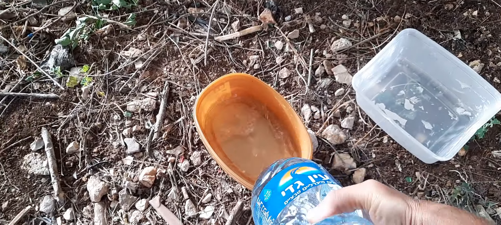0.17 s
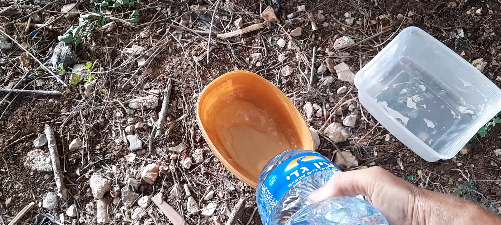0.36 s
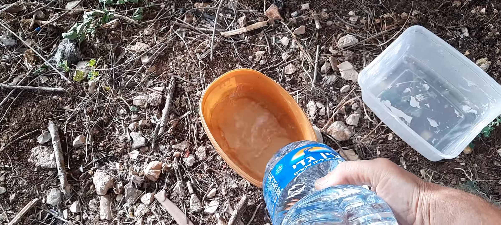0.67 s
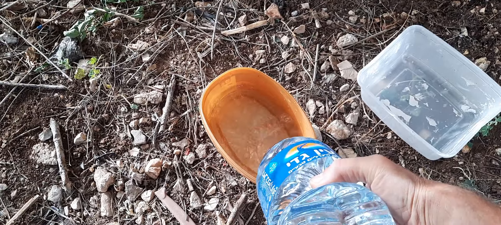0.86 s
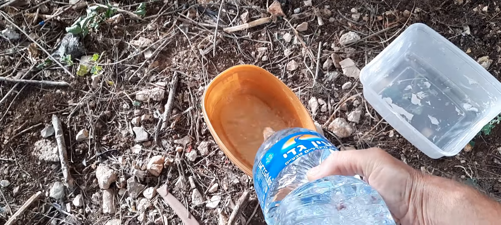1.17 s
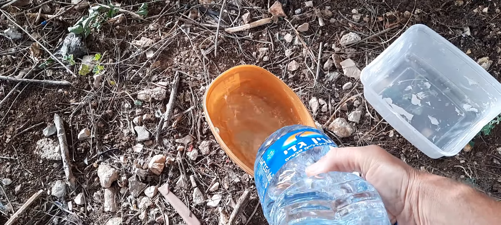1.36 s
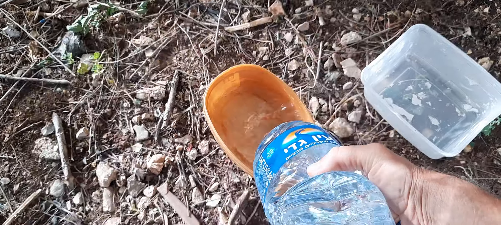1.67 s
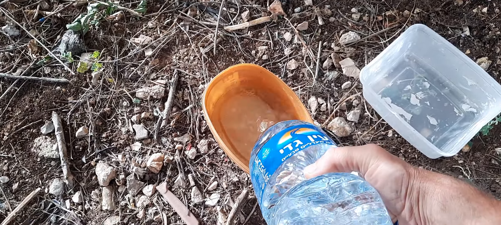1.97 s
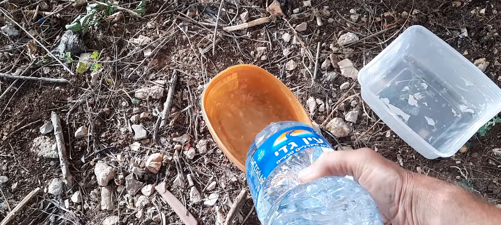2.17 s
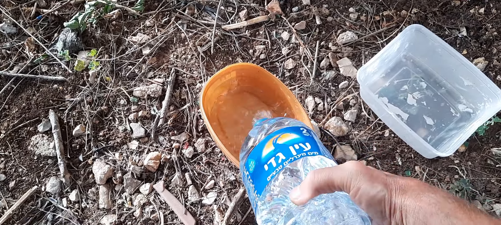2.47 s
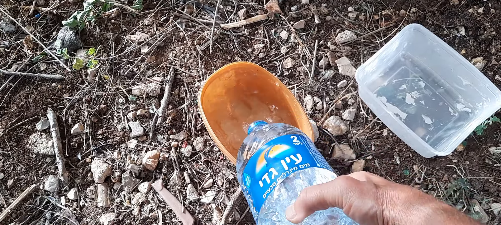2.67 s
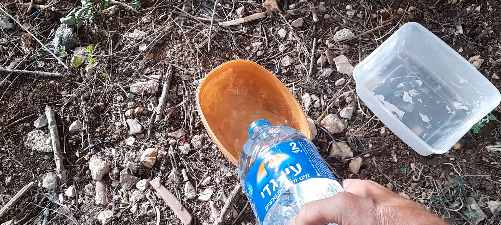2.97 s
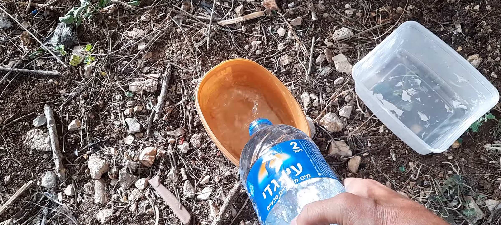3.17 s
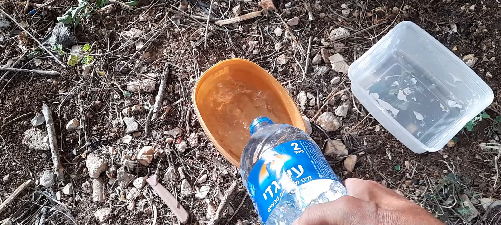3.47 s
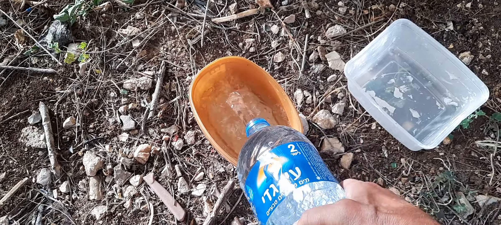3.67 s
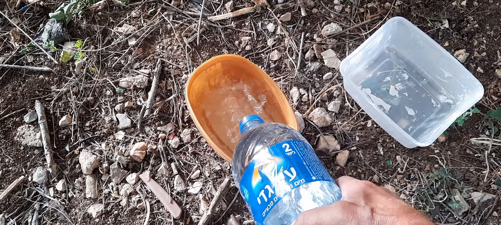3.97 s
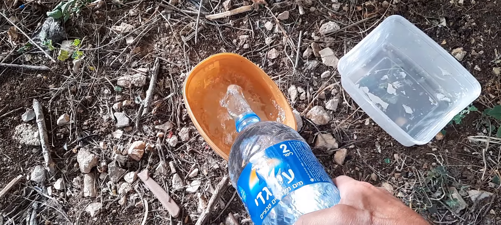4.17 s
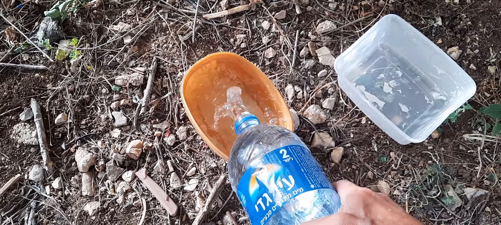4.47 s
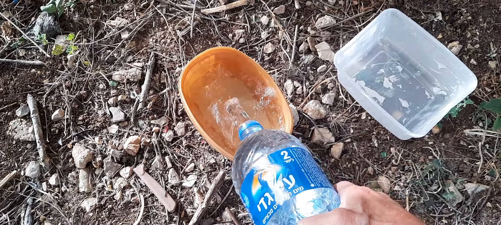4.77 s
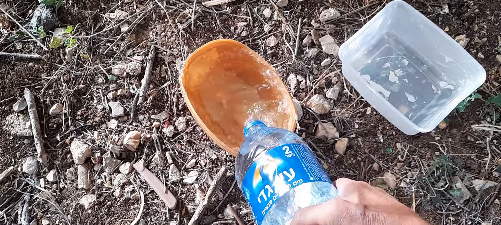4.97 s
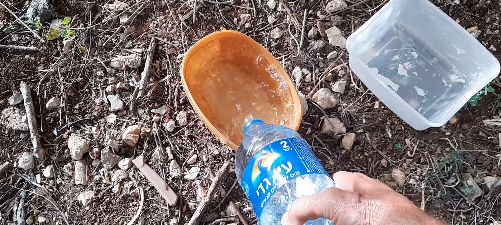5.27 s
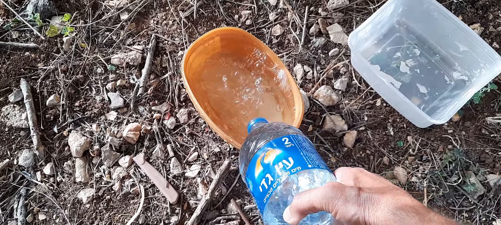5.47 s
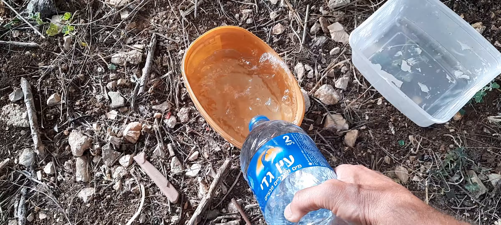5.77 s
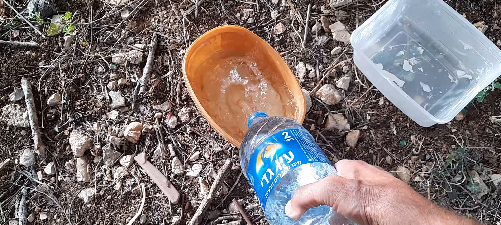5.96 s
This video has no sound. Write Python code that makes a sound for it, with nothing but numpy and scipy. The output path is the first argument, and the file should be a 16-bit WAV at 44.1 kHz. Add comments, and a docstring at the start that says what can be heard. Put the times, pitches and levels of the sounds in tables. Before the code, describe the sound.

Water glugs from a thin plastic bottle into a plastic bowl outdoors, with wall pops, splashing, a faint bird whistle and distant hoot.

```python
"""Air gulps through the neck of a hand-held plastic bottle as water glugs into a plastic bowl.
Gulps are decaying bubble tones that ring damped bottle modes; the wall's snaps are noise bursts through resonances.
Stream and bowl are patchy coloured noise under swarms of bubble sines that climb in pitch.
Behind them a bird whistles and an animal hoots, as gliding tones, over a far hush,
low breeze noise on the microphone ports and soft low bumps."""
import sys
import numpy as np
from scipy import signal
from scipy.fft import rfft, irfft, next_fast_len
from scipy.io import wavfile
from scipy.ndimage import uniform_filter1d, map_coordinates

SR = 44100
rng = np.random.default_rng(int(sys.argv[2]) if len(sys.argv) > 2 else 0)


def bounce(signal):
    """Save signal as a 16-bit WAV file at the path given by the first command-line argument."""
    frames = np.transpose(np.atleast_2d(signal))
    limited = np.clip(frames, -1, 1)
    pcm = np.round(limited * 32767).astype(np.int16)
    wavfile.write(sys.argv[1], SR, pcm)


N = 269451

# Air gulped into the bottle: start_s, level_db, pitch_hz, t60_s (at least 0.006 is used), ring_db
GULPS = [(0.09, -32.5, 356, 0.041, -13), (0.151, -12.5, 323.5, 0.071, -3), (0.185, -3, 340, 0.0052, -11.5),
         (0.28, -7.5, 413, 0.033, -25), (0.3, -15.5, 397, 0.055, 0), (0.445, -25, 353, 0.048, -18),
         (0.564, -20, 353, 0.07, -35), (1.326, -40.5, 404, 0.05, -7), (1.433, -39, 422, 0.021, -2),
         (1.516, -37, 319, 0.049, 3), (1.56, -40.5, 380, 0.1, -11), (1.709, -42, 400, 0.064, -5.5),
         (1.843, -32.5, 350, 0.023, -2.5), (1.892, -39, 438, 0.055, -18), (1.954, -38, 412, 0.026, -5),
         (2.478, -31.5, 427, 0.03, -11), (2.496, -24, 420, 0.053, -10), (2.572, -23, 417, 0.036, -12.5),
         (2.729, -22, 420, 0.021, -7), (2.756, -15, 288, 0.016, -6), (2.843, -20, 432, 0.028, -9),
         (2.887, -32, 352, 0.041, -10), (2.996, -24.5, 398, 0.012, -6.5), (3.034, -15.5, 328, 0.028, -3.5),
         (3.38, -38.5, 326, 0.065, -14), (3.731, -34.5, 382, 0.027, -6), (3.857, -5.5, 377, 0.026, -6.5),
         (4.113, -12, 389, 0.022, -13), (4.237, -8.5, 379, 0.024, -8), (4.408, -11, 386, 0.022, -17.5),
         (4.544, -11.5, 404, 0.028, -6), (4.682, -12.5, 392, 0.025, -13), (4.831, -20.5, 402, 0.058, 3.5),
         (4.99, -11, 388, 0.019, -14.5), (5.104, -15, 336, 0.021, -4), (5.294, -13, 372, 0.022, -14.5),
         (5.393, -19.5, 344, 0.0095, -1), (5.577, -11, 375, 0.02, -17), (5.692, -19.5, 322, 0.082, -1.5),
         (5.866, -13, 330, 0.026, -16), (5.992, -16.5, 329, 0.087, -8)]
# Modes of the air and water inside: pitch_hz, level_db, t60_s
BOTTLE_MODES = [(158, -18, .1), (212, -16, .09), (312, 0, .12), (372, 0, .12), (480, -3, .085),
                (560, -8, .06), (730, -12, .06)]
# The jolt deepens once the bottle is tipped up: time_s, level_over_ring_db
JOLT_LEVEL = [(0, -47), (2.6, -48), (3.9, -17.5), (4.1, -3.5), (6.11, 23)]
# Noise of the closing neck: frequency_hz, level_db
PINCH_SPECTRUM = [(350, -34), (550, -7.5), (1000, 1.5), (1500, -4.5), (2200, -14.5), (4000, -39.5)]


def gulps():
    """Bubble resonance: each air bubble pulses at its own pitch, rings the bottle's modes and jolts it."""
    out, jolts = np.zeros((2, N)), np.zeros((2, N))
    t = np.arange(SR // 4) / SR
    for s, db, hz, t60, ring_db in GULPS:
        bubble_decay = amp(4 - 60 * (t / np.clip(t60, .006, 1)) ** 1.5)
        bubble = bubble_decay * np.sin(2 * np.pi * hz * t)
        pinch = amp(-12 - 60 * t / 0.042) * noise(PINCH_SPECTRUM, len(t))  # the neck closes behind the bubble
        jolt_db = ring_db + np.interp(s, *np.transpose(JOLT_LEVEL))
        jolt = amp(jolt_db - 60 * t / 0.049) * np.sin(2 * np.pi * 157 * t)
        ring = amp(ring_db) * ringing(BOTTLE_MODES, t, scatter_db=3.5, side_db=2, blur=18)
        onset = np.sin(np.clip(t / 0.0052, 0, 1) * np.pi / 2) ** 2
        add(out, s, amp(db) * onset * (bubble + pinch + ring), pan_db=1.0)
        add(jolts, s, amp(db) * onset * jolt)
    # a small bottle radiates no deep bass
    return highpass(jolts, 2, 120) + highpass(out, 3, 210)


# Wall snaps: start_s, level_db, treble_db (relative), colour_hz, fall_above_colour_db_per_octave, rattle_s
SNAPS = [(0.173, -14.5, -30, 1150, 10, 0.0035), (0.178, -12, -40, 1260, 26, 0.0064),
         (0.2732, -20, -19, 2000, 11, 0.0032), (0.279, -5.5, -13.5, 1940, 11, 0.0024),
         (0.344, -14, -27.5, 1600, 26, 0.0081), (0.509, -27, -16.5, 1050, 20, 0.0023),
         (0.5664, -0.5, -19, 1540, 20, 0.0025), (0.9803, -50, 10, 2920, 7, 0.008),
         (2.104, -28, -10, 1940, 2, 0.0034), (2.7507, -8.5, -45, 1530, 7, 0.002),
         (2.757, -10, -34, 1640, 16, 0.0053), (3.008, -15.5, -44, 1510, 13, 0.0046),
         (3.038, -6.5, -5, 2370, 20, 0.003), (3.307, -29, -20, 1980, 13, 0.029),
         (3.859, -6.5, -11, 1580, 16, 0.0031), (4.237, -4.5, -31, 1130, 7, 0.0036),
         (4.544, -5.5, -37, 1080, 1.5, 0.004), (4.8339, -5, -35, 1110, 2.5, 0.0045),
         (5.033, -15.5, -21, 1390, 15, 0.002), (5.1062, -5, -40, 1100, 3.5, 0.0038),
         (5.3961, -7.5, -36, 1090, 7.5, 0.0042), (5.695, -6.5, -37, 1150, 8.5, 0.0038),
         (5.9936, -9.5, -53, 1830, 29, 0.0024)]
# Modes of the wall: pitch_hz, level_db, decay_s (bandwidth is 3 / decay_s, with at least 0.004 used)
WALL_MODES = [(778, -7, 0.038), (1106, -0.5, 0.025), (1518, 0.5, 0.01), (2020, -0.5, 0.02),
              (2617, 1.5, 0.015), (3138, -3.5, 0.0097), (3810, -8.5, 0.0071), (4350, -10, 0.011),
              (5160, -5, 0.0036), (6480, 0.5, 0.0033)]
# Noise of the crack that drives the wall: frequency_hz, level_db
CRACK_SPECTRUM = [(200, -7), (500, 3), (1000, -3.5), (4000, -2), (6400, -15), (7500, -19), (9500, -120)]
# Treble tick beside the crack: frequency_hz, level_db
TICK_SPECTRUM = [(3240, 8), (5500, 6.5), (6670, 4.5), (8280, 8), (10300, -5.5), (14500, 2), (16500, -24)]


def snaps():
    """Snap-through buckling: a dent creaks, then pops, and its rattle of cracks excites the wall's modes."""
    out = np.zeros((2, N))
    t = np.arange(-SR // 200, SR // 10) / SR
    after = np.maximum(t, 0)
    hz_k, db_k, decay_k = np.transpose(WALL_MODES)[..., None, None]
    width = 3 / np.clip(decay_k, .004, .1)
    for s, db, treble_db, hz, fall_db, length in SNAPS:
        age = after / np.clip(length, .0008, .03)
        spikes = amp(1.93 * np.repeat(rng.standard_normal(len(t) // 12 + 1), 12)[:len(t)])
        rattle = spikes * 3 * age * np.exp(1 - 3 * age)
        tail = amp(-13 - 60 * after / 0.092) * (1 - np.exp(-after / 0.0021))
        creak = amp(-35) * (t < .002)
        burst = rattle + tail + creak

        # modes near the dent's own colour are driven most
        octaves = np.log2(hz_k / hz)
        tilt_db = np.where(octaves > 0, fall_db, -6) * octaves
        chance = rng.standard_normal((len(WALL_MODES), 2, 1))
        chance_db = 2.7 * chance[:, :1] + 1.1 * chance[:, 1:] * [[1], [-1]]
        gain = amp(db_k - tilt_db + chance_db)

        def wall(f):
            """Modal superposition: resonances stand over the bare crack, which falls above the colour."""
            modes = gain * 1j * f * width / (hz_k ** 2 - f ** 2 + 1j * f * width)
            return modes.sum(axis=0) + amp(-6.5 - fall_db * np.log2(1 + f / hz))

        crack = filtered(burst * noise(CRACK_SPECTRUM, len(t)), wall)
        tick = amp(treble_db + 3.5) * burst * noise(TICK_SPECTRUM, len(t))
        add(out, s + t[0], amp(db) * (crack / np.abs(crack).max() + tick), pan_db=1.5)
    return highpass(out, 2, 330)  # a thin wall radiates no bass


# Water moving in the bottle: time_s, level_db (before a fixed gain)
SLOSH = [(0, -58.5), (.2, -44), (.45, -51.5), (.8, -66.5), (1.25, -62), (1.6, -63.5), (2, -59), (2.6, -64),
         (2.9, -57), (3.4, -67), (3.7, -63), (6.11, -64.5)]
# Noise of that water: frequency_hz, level_db
GURGLE_SPECTRUM = [(120, -120), (230, -25), (310, 2.5), (400, -4), (500, -2), (620, -24), (900, -120)]
# Noise of the splash: frequency_hz, level_db
SPLASH_SPECTRUM = [(320, -48), (550, -2), (606, -50.5), (700, 8.5), (882, -12.5), (1320, 4.5), (1600, 0.5),
                   (2470, 1), (3030, -7.5), (5500, -22), (7150, -32), (12100, -120)]
# Noise of spray and droplets: frequency_hz, level_db
SPRAY_SPECTRUM = [(2650, -1.5), (4500, 1.5), (8590, -1.5), (9580, -10.5), (15100, -0.5), (15900, -38),
                  (16500, -18)]


def stream():
    """Jet breakup: the jet splashes, sprays and drags bubbles under, while water in the bottle gurgles."""
    splash_db, spray_db = jet()
    surge_db = 2.3 * wobble(45) + 2 * wobble(12)  # the jet breaks up unevenly
    gurgle_db = curves(SLOSH)[0] + 10.5 + 0.86 * wobble(30)
    out = amp(gurgle_db) * patches(noise(GURGLE_SPECTRUM, N), 6.7, bins=1, frames=8)

    def bowl_swell(f):
        """Resonance: the wash swells around the pitches that the bowl favours."""
        peaks = [np.exp(-.5 * ((f - hz) / (BOWL_SCATTER * hz)) ** 2) for hz, _ in BOWL_PITCHES]
        return amp(BOWL_BOOST_DB * sum(peaks))

    wash = patches(filtered(noise(SPLASH_SPECTRUM, N), bowl_swell), 4.8, bins=3, frames=5)
    spray = patches(noise(SPRAY_SPECTRUM, N), 5.0, bins=16, frames=3)
    out += amp(splash_db - 13 + surge_db) * wash
    out += amp(spray_db - 2.5 + surge_db) * spray

    middle_hz = 3000 * np.exp(0.408 * rng.standard_normal(size=2200))
    high_hz = rng.uniform(4500, 17000, size=1800)
    out += swarm(2200, bowl_hz(2200), cycles=15.8, curve_db=splash_db - 8 + surge_db, size=900)
    out += swarm(2200, middle_hz, cycles=9.6, curve_db=splash_db - 7.5 + surge_db, size=350)
    out += swarm(1800, high_hz, cycles=5, curve_db=spray_db + 8 + surge_db, size=100)
    return out + broods(count=11)


# The jet, before each layer's own gain: time_s, splash_db, spray_db
STREAM = [(0, -46.5, -49.5), (.3, -45, -48), (.48, -43, -54.5), (.72, -61.5, -68), (.96, -46, -50.5),
          (1.2, -51.5, -58), (1.5, -40.5, -48.5), (1.66, -55.5, -57.5), (1.84, -42.5, -54),
          (2.14, -44, -44.5), (2.27, -43.5, -55), (2.315, -49, -53), (2.39, -40, -53), (2.62, -49.5, -52.5),
          (2.9, -42, -46.5), (3.36, -45.5, -56.5), (3.52, -63.5, -64), (3.58, -42.5, -51), (3.67, -42, -49),
          (4.05, -49.5, -52.5), (4.19, -48.5, -45.5), (4.29, -54.5, -59.5), (4.45, -45, -46),
          (5.04, -43.5, -55), (5.5, -49, -52.5), (5.8, -52, -58), (5.84, -50.5, -55), (5.89, -58, -51),
          (6.11, -52.5, -60)]
# Swell of splash and spray around each large bubble, and its width
SPLASH_SWELL_DB, SPRAY_SWELL_DB, SWELL_S = 2, 3.5, 0.021


def jet():
    """Unsteady flow: splash and spray swell where a slug of water lands with each large bubble."""
    t = np.arange(0, N, 64) / SR
    slugs = np.tanh(sum(np.exp(-.5 * ((t - row[0]) / SWELL_S) ** 2) for row in BUBBLES))
    slugs = np.interp(np.arange(N) / SR, t, slugs - slugs.mean())
    splash_db, spray_db = curves(STREAM)
    return splash_db + SPLASH_SWELL_DB * slugs, spray_db + SPRAY_SWELL_DB * slugs


# Single large bubbles in the bowl: start_s, level_db, pitch_hz, life_cycles
BUBBLES = [(0.015, -27, 1540, 6.6), (0.074, -24.5, 1340, 6.9), (0.088, -24.5, 1760, 21),
           (0.404, -24.5, 1770, 3.5), (0.67, -46, 598, 30), (1.056, -22.5, 880, 4.4),
           (1.073, -30, 1650, 13), (1.446, -32.5, 730, 8.1), (1.483, -26.5, 900, 3.8),
           (1.758, -34, 2300, 35), (1.816, -23, 2040, 9.1), (1.828, -26.5, 940, 6.2),
           (1.953, -31, 716, 8.9), (1.979, -28.5, 1510, 8.5), (2.087, -32, 1550, 18),
           (2.101, -21, 2470, 25), (2.103, -17.5, 1650, 16), (2.112, -31, 1560, 42),
           (2.208, -26.5, 2640, 9), (2.242, -32, 3330, 17), (2.271, -36, 2080, 18), (2.222, -36, 966, 18),
           (2.414, -29, 1420, 9.5), (2.826, -18, 835, 1.3), (2.849, -34, 746, 7.7),
           (2.931, -30.5, 2670, 24), (3, -30, 4050, 20), (3.1, -34, 2660, 19), (3.177, -41, 3380, 18),
           (3.384, -36, 2370, 14), (3.665, -34.5, 2440, 8.3), (3.837, -20.5, 1340, 16),
           (3.961, -19.5, 1110, 6.7), (3.985, -32.5, 750, 6), (4.003, -29.5, 965, 15),
           (4.124, -31, 2580, 13), (4.136, -26, 1560, 9.7), (4.175, -31, 3630, 31), (4.177, -27, 1495, 16),
           (4.185, -16, 2740, 8.2), (4.186, -18.5, 3480, 7.6), (4.319, -28.5, 1460, 17),
           (4.378, -26.5, 1350, 10), (4.387, -29, 3740, 13), (4.44, -29, 1410, 9), (4.441, -34, 5200, 27),
           (4.459, -29, 3630, 11), (4.47, -29, 1600, 7.2), (4.642, -32.5, 1600, 21), (4.748, -25, 1440, 26),
           (4.762, -22, 1610, 6.2), (4.895, -24.5, 1270, 10), (4.916, -31, 1160, 10),
           (5.056, -21.5, 1590, 12), (5.2, -26.5, 1040, 19), (5.198, -30, 1560, 24), (5.226, -37, 1530, 14),
           (5.24, -25.5, 2700, 20), (5.245, -24.5, 1100, 7), (5.486, -26, 1430, 6.3),
           (5.494, -21.5, 994, 8.4), (5.517, -31, 2370, 15), (5.534, -18, 4050, 7.4),
           (5.549, -32, 1190, 7.2), (5.553, -37, 1550, 8.6), (5.762, -39, 1130, 16), (5.792, -45, 1580, 18),
           (5.832, -31.5, 2600, 15), (5.847, -18, 2510, 7.6)]
# Smaller bubbles: level under the large one, level scatter, time spread
BROOD_DB, BROOD_SPREAD_DB, BROOD_S = -13, 2.5, .025
BROOD_OVER_DB = 21.5  # cap over the splash curve on the level that a clump takes from its large bubble


def broods(count):
    """Bubble entrainment: each large bubble drags a clump of smaller ones along."""
    s, db, hz, cycles = np.transpose(BUBBLES)
    top_db = np.interp(s, *np.transpose(STREAM)[:2]) + BROOD_OVER_DB
    late, bulk, side, life = rng.standard_normal((len(s) * count, 4)).T
    when = np.clip(np.repeat(s, count) + BROOD_S * (late + .5), 0, N / SR - .01)
    small_db = np.repeat(np.minimum(db, top_db), count) + BROOD_DB + BROOD_SPREAD_DB * bulk
    small_cycles = 12 * np.exp(.4 * life)
    small = bubbles(when, small_db, bowl_hz(len(when)), 3 * side, small_cycles, rise=.06, size=900)
    large = bubbles(s, db, hz, 4.2, cycles, rise=0.05, size=1200)
    return small + large + risers()


# Bubbles that break through the surface: start_s, level_db, starting_pitch_hz, life_cycles
RISERS = [(1.053, -39, 830, 22), (2.36, -46, 946, 31), (3.099, -36, 775, 29.7)]


def risers():
    """Rising bubble resonance: long bubbles sweep widely upward as they break through the surface."""
    s, db, hz, cycles = np.transpose(RISERS)
    return bubbles(s, db, hz, 1, cycles, rise=0.92, size=2400)


def swarm(count, hz, cycles, curve_db, size):
    """Random superposition: bubbles at chance moments, few loud and many soft."""
    when, bulk, side, life = rng.random((count, 4)).T
    at = (when * (N - 1)).astype(int)
    level_db = curve_db[at] - 3.8 * np.log(bulk + .045)
    rise = .25 * life[:, None] ** 3
    return bubbles(at / SR, level_db, hz, 6 * (side - .5), cycles * (.5 + life), rise, size)


# Pitches that the bubbles favour: pitch_hz, share (relative)
BOWL_PITCHES = [(860, .15), (1080, 0.23), (1600, 0.26), (2650, 0.16), (3300, 0.053)]
BOWL_SCATTER, BOWL_BOOST_DB = .07, 6  # relative pitch spread about them; swell of the wash there


def bowl_hz(count):
    """Resonant selection: random bubble pitches cluster around those that the bowl favours."""
    favoured, share = np.transpose(BOWL_PITCHES)
    chosen = rng.choice(favoured, size=count, p=share / share.sum())
    return chosen * np.exp(BOWL_SCATTER * rng.standard_normal(size=count))


def bubbles(s, db, hz, pan_db, cycles, rise, size):
    """Damped bubble oscillation: sines swell and die as pitch climbs by the share rise over a life."""
    t = np.arange(size) / SR
    age = t * (hz / cycles)[:, None]  # in lives
    envelope = 1.38 * np.exp(-3 * age) * (1 - np.exp(-6 * age))
    wave = envelope * np.sin(2 * np.pi * hz[:, None] * t * (1 + rise * age / 2))
    at = (np.round(s * SR).astype(int)[:, None] + np.arange(size)).ravel()
    sides = [(wave * amp(db + side * pan_db / 2)[:, None]).ravel() for side in (1, -1)]
    return np.array([np.bincount(at, x, N + size)[:N] for x in sides])


# Spits of fine droplets, before a fixed gain: start_s, level_db
SPITS = [(0.2234, -33.5), (1.758, -29.5), (1.8264, -34), (2.0223, -33.5), (2.15, -27), (2.381, -31),
         (2.865, -25.5), (2.888, -28.5), (2.945, -53), (2.978, -52), (3.3194, -41), (3.399, -28.5),
         (4.324, -36), (4.365, -33.5), (4.4432, -25.5), (4.462, -26), (4.485, -29), (4.7566, -28),
         (4.7705, -23.5), (4.809, -35), (4.8953, -34), (4.9459, -25), (4.954, -26), (4.973, -29),
         (5.009, -28), (5.053, -25.5), (5.1381, -28.5), (5.175, -36), (5.536, -25.5), (5.6425, -30.5),
         (5.832, -27), (5.8524, -28.5), (5.9272, -36.5)]


def spits():
    """Impact noise: short ragged bursts of droplets are thrown on the bowl."""
    out, t = np.zeros((2, N)), np.arange(SR // 20) / SR
    for s, db in SPITS:
        ragged_db = 3 * np.repeat(rng.standard_normal(len(t) // 60 + 1), 60)[:len(t)]
        drops = noise(SPRAY_SPECTRUM, len(t)) + amp(-31.0) * noise(SPLASH_SPECTRUM, len(t))
        decay = amp(db - 8.5 + ragged_db - 60 * t / 0.046)  # t60 of 46 ms
        add(out, s, decay * np.clip(t / .001, 0, 1) * drops)
    return out


# Bird notes: start_s, length_s, pitch_hz, level_db
WHISTLE = [(1.03, .125, 2610, -56), (1.238, .135, 2560, -50.5), (1.435, .165, 2505, -51.5),
           (1.66, .145, 2500, -51)]
# Shape of one note: share_of_length, pitch_ratio, relative_level_db
NOTE_SHAPE = [(0, 1.045, -10), (.3, 1.008, -3), (.55, 1, 0), (1, 1.008, -11)]
# An arched bird call: time_s, pitch_hz, level_db
CHIRP = [(2.282, 3850, -66), (2.303, 4080, -57), (2.328, 4060, -57), (2.345, 3400, -63), (2.37, 2550, -62)]
# The far hoot: time_s, pitch_hz, level_db
HOOT = [(3.14, 395, -66), (3.24, 430, -60), (3.33, 432, -62), (3.41, 431, -55), (3.47, 426, -66),
        (3.54, 424, -76)]
# Its harmonics: multiple_of_pitch, level_db
HOOT_PARTIALS = [(1, -5), (2, -1.5), (5, -5)]


def animals():
    """Interaural delay: the bird sits to one side, the hoot comes from far off to the other."""
    calls = [[(s + share * length, hz * ratio, db + shape_db) for share, ratio, shape_db in NOTE_SHAPE]
             for s, length, hz, db in WHISTLE]
    bird = sum(tone(call, [(1, 0)], waver=.002, flutter_db=2) for call in calls + [CHIRP])
    hoot = tone(HOOT, HOOT_PARTIALS, waver=.007, flutter_db=4.5)
    return np.array([bird + np.roll(hoot, 8), np.roll(bird, 3) + hoot])


def tone(rows, partials, waver, flutter_db):
    """Harmonic synthesis: a call follows its pitch and level, silent outside its rows."""
    hz, db = curves(rows)
    t = np.arange(N) / SR
    turn = 2 * np.pi * np.cumsum(hz * (1 + waver * wobble(67))) / SR
    on = (t > rows[0][0]) & (t < rows[-1][0])
    voice = sum(amp(level) * np.sin(k * turn) for k, level in partials)
    return on * np.sqrt(2) * amp(db + flutter_db * wobble(70)) * voice


# Breeze, before a fixed gain: time_s, level_db
BREEZE = [(0, -64), (.2, -50), (.72, -63.5), (1, -59), (1.3, -66), (1.45, -61), (1.55, -54.5),
          (1.82, -56.5), (1.92, -59), (2.85, -62), (3.1, -52.5), (3.6, -68), (4.5, -53), (5.2, -55.5),
          (5.45, -54), (5.85, -48), (6.11, -48)]
# Noise of the buffeting: frequency_hz, level_db
RUMBLE_SPECTRUM = [(15, -42), (35, -7), (60, -0.5), (85, 2), (130, -5), (230, -4.5), (320, -36),
                   (500, -120)]


def breeze():
    """Turbulent pressure: buffeting comes in lumps and differs from port to port."""
    lumps = amp(3.5 * wobble(9) + 3.5 * np.array([wobble(16), wobble(16)]))
    rumble = noise(RUMBLE_SPECTRUM, N, [(50, -.1), (200, .6)])
    return amp(curves(BREEZE)[0] + 3) * unit(lumps * rumble)


# Low bumps on the microphone: start_s, level_db, pitch_hz
BUMPS = [(0.181, -47, 62), (0.95, -47, 83), (1.53, -52, 65), (1.611, -47, 89), (1.726, -39, 76.5),
         (3.07, -47, 70), (3.14, -52, 69), (5.664, -35.5, 69), (5.83, -47, 80), (5.92, -41, 70)]
BUMP_PEAK_S = 0.0082  # time to the peak of the envelope


def bumps():
    """Transient pressure: short low pushes are stronger on one port or the other."""
    out, t = np.zeros((2, N)), np.arange(SR // 6) / SR
    envelope = t / BUMP_PEAK_S * np.exp(1 - t / BUMP_PEAK_S)
    for (s, db, hz), side in zip(BUMPS, rng.standard_normal(len(BUMPS))):
        add(out, s, amp(db) * envelope * np.sin(2 * np.pi * hz * t), pan_db=14 * np.sign(side))
    return out


# Far outdoor air: frequency_hz, level_db
AIR_SPECTRUM = [(300, -40), (550, 0), (1000, -6), (3000, -12), (8500, -18), (9500, -24), (15500, -24),
                (16500, -40)]


def hush():
    """Diffuse field: a steady far hush, nearly unrelated on the two sides."""
    return amp(-63) * noise(AIR_SPECTRUM, N, [(500, 0.13), (5000, .1)])


def amp(db):
    """Decibel law: level to amplitude ratio."""
    return 10 ** (np.asarray(db) / 20)


def unit(x):
    """Normalisation to an rms of 1."""
    return x / np.sqrt(np.mean(x ** 2) + 1e-20)


def along(points, hz):
    """Logarithmic frequency scale: interpolates (frequency_hz, value) points."""
    f, v = np.transpose(points)
    return np.interp(np.log(hz + 1), np.log(f + 1), v)


def curves(rows):
    """Linear interpolation: one value per sample for each column after the time."""
    s, *cols = np.transpose(rows)
    return [np.interp(np.arange(N) / SR, s, c) for c in cols]


def wobble(rate):
    """Slow random modulation: a smooth curve with rate knots a second."""
    knots = rng.standard_normal(int(N * rate / SR) + 4)
    return map_coordinates(knots, [np.arange(N) * rate / SR])


def filtered(x, response):
    """Linear filtering: multiplies the spectrum by a complex response of frequency."""
    m = next_fast_len(x.shape[-1] + 4096)
    return irfft(rfft(x, m) * response(np.fft.rfftfreq(m, 1 / SR)), m)[..., :x.shape[-1]]


def highpass(x, order, hz):
    """Low-frequency roll-off by a Butterworth filter."""
    return signal.sosfilt(signal.butter(order, hz, "high", fs=SR, output="sos"), x)


# Likeness of left and right: frequency_hz, correlation
LIKENESS = [(200, .97), (500, .8), (1000, .8), (3000, .72), (8000, .66), (16000, .55)]


def noise(spectrum, size, alike=LIKENESS):
    """Partial coherence: coloured stereo noise of rms 1 whose two sides are partly alike."""
    def colour(hz):
        """Mid-side balance that sets the correlation at each frequency."""
        turn = np.arccos(np.clip(along(alike, hz), -1, 1)) / 2
        return amp(along(spectrum, hz)) * [np.cos(turn), np.sin(turn)]

    mid, side = filtered(rng.standard_normal((2, size)), colour)
    return unit(np.array([mid + side, mid - side]))


def patches(x, depth_db, bins, frames):
    """Spectral modulation: random gain over time and frequency makes each band swell on its own."""
    z = signal.stft(x, nperseg=256)[2]
    field = uniform_filter1d(rng.standard_normal(z.shape[1:]), size=bins, axis=0)
    field = uniform_filter1d(field, size=frames, axis=1)
    return unit(signal.istft(z * amp(depth_db * unit(field)), nperseg=256)[1][:, :N])


def ringing(modes, t, scatter_db, side_db, blur):
    """Damped modes: strengths vary by blow and port, and moving water makes the phase wander."""
    out = 0
    for hz, db, t60 in modes:
        chance_db = scatter_db * rng.standard_normal() + side_db * rng.standard_normal() * np.array([[1], [-1]])
        walk = np.cumsum(rng.standard_normal(len(t)))
        wander = blur * uniform_filter1d(walk, size=120) / np.sqrt(SR)
        out = out + amp(db + chance_db - 60 * t / t60) * np.sin(2 * np.pi * hz * t + wander)
    return out


def add(out, s, sound, pan_db=0):
    """Superposition: mixes a sound into the stereo track at time s."""
    part = out[:, round(s * SR):][:, :sound.shape[-1]]
    part += (sound * amp([[pan_db / 2], [-pan_db / 2]]))[:, :part.shape[1]]


# Phase between the microphone ports: frequency_hz, left_lead_rad
PORT_LEAD = [(1000, 0), (3800, .3), (6000, 1.3), (16000, 1.1)]


def scene():
    """Superposition: near sounds reach the ports with a phase lead, over the animals and the air."""
    near = gulps() + snaps() + stream() + spits()
    ports = filtered(near, lambda hz: np.exp(1j * along(PORT_LEAD, hz) * [[.5], [-.5]]))
    return ports + animals() + breeze() + bumps() + hush()


def record(dry):
    """Saturation and band limit: the phone rounds off high peaks and keeps nothing above 16.6 kHz."""
    held = dry / (1 + np.abs(dry / .87) ** 6) ** (1 / 6)
    return filtered(held, lambda hz: np.clip((16600 - hz) / 700, 0, 1) ** 2)


dry = scene()
out = record(dry)
bounce(out)
```